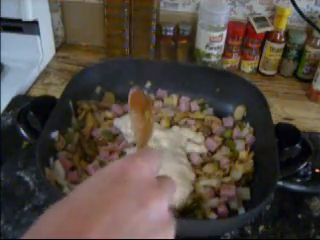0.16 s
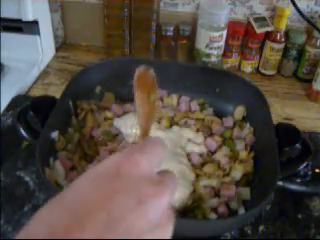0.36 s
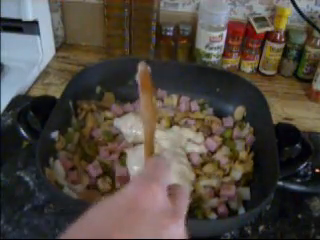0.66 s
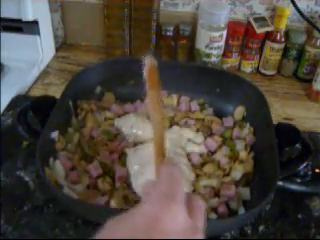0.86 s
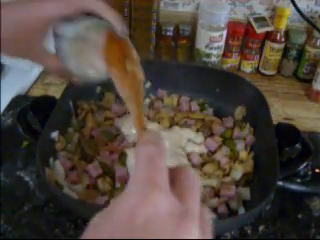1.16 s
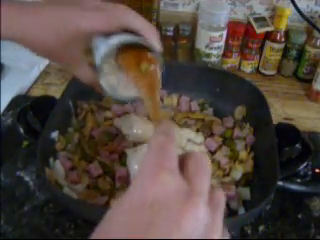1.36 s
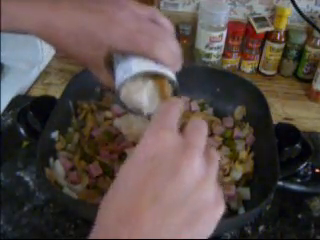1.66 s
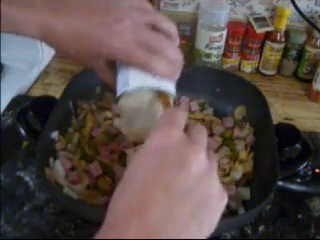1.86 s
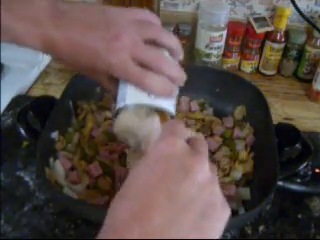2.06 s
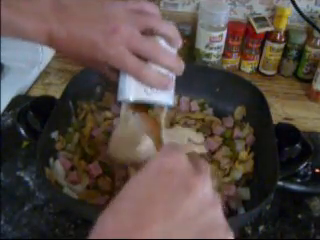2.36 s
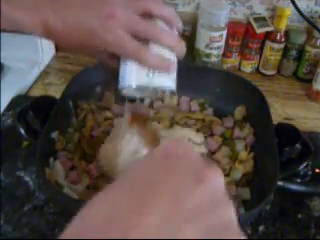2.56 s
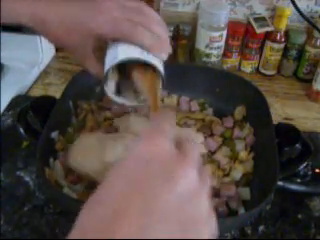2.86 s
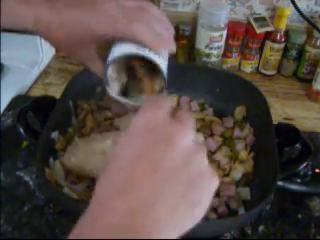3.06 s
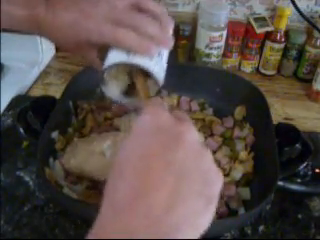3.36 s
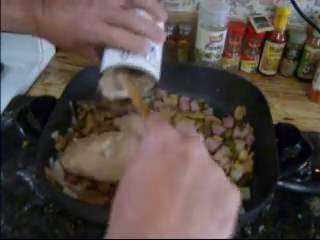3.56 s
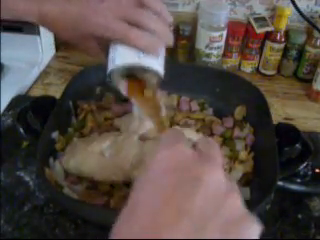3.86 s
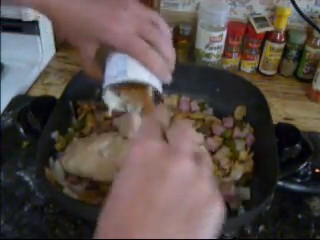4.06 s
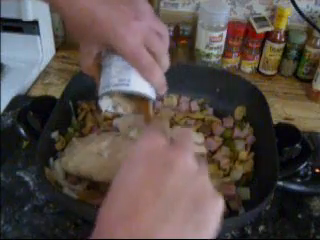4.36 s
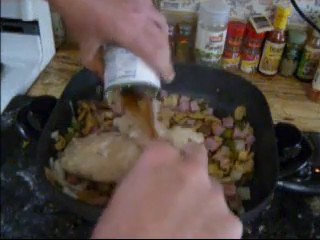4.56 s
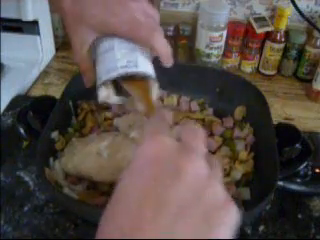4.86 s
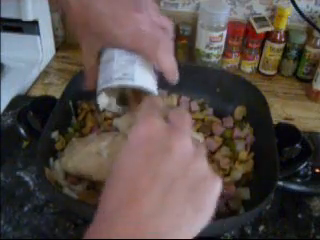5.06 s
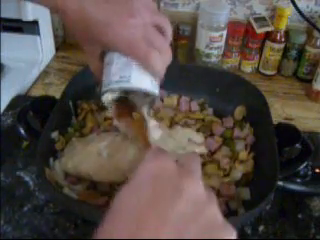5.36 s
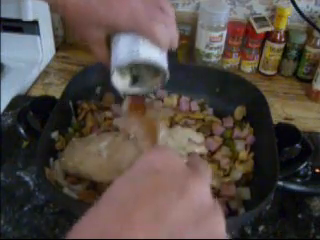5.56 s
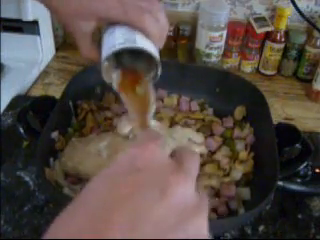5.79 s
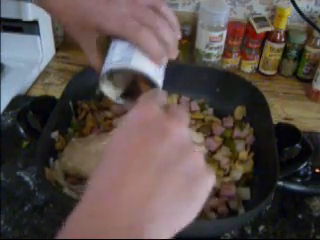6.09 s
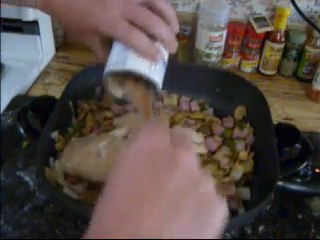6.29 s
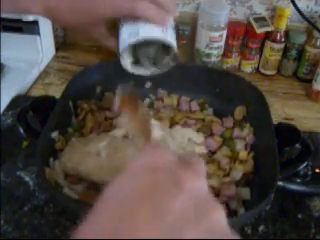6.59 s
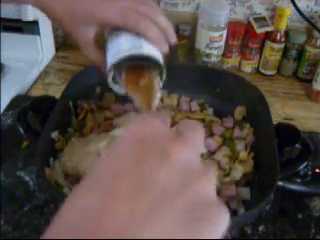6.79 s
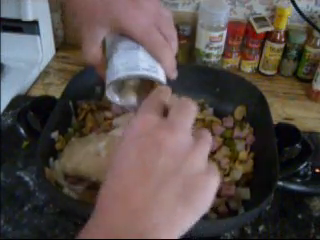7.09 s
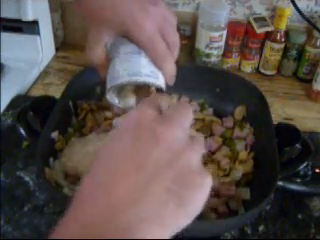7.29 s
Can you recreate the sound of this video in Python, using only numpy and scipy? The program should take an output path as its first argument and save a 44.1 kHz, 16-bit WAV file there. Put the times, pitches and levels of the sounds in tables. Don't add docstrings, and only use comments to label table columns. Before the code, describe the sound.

Close, dull tinny thocks and short gritty rubs of wood in a soup-lined can, with gentle frying and spitting fat behind.

```python
import sys
import numpy as np
from scipy import signal
from scipy.io import wavfile
from scipy.ndimage import uniform_filter1d

SR = 44100
rng = np.random.default_rng(int(sys.argv[2]) if len(sys.argv) > 2 else 0)


def magnitude_from_level(level_db):
    exponent = np.asarray(level_db, float) / 20
    return 10 ** exponent


def unload_audio(sound):
    columns = np.transpose(np.atleast_2d(sound))
    steps = np.round(np.clip(columns, -1, 1) * 32767)
    wavfile.write(sys.argv[1], SR, steps.astype(np.int16))


N = 327663

# start_s, peak_db, cavity_hz, brightness_db, favoured_upper_mode_hz
KNOCKS = [(3.036, -4.5, 888, -14.5, 3400), (3.043, -19, 910, -5, 3500), (3.179, -17.5, 842, -12.5, 1760),
          (4.054, -24.5, 694, -16, 1415), (4.134, -27.5, 782, -13, 2230), (4.226, -11.5, 792, -11.5, 1930),
          (4.502, -22.5, 590, -17, 2230), (4.892, -18.5, 662, -31, 3050), (5.3, -20, 654, -9, 1800),
          (5.325, -30, 600, -1, 4000), (6.354, -25, 635, -3, 2230), (7.053, -15.5, 813, -0.5, 2160),
          (7.417, -14, 662, -18, 2720)]
# pitch_hz, level_db, t60_s
LOW_MODES = [(378, -28.5, 0.061), (428, 13, 0.015), (500, 0, .06), (600, -8, 0.11), (630, -6.5, 0.15),
             (662, -13, 0.04), (670, -9, 0.027), (767, -12.5, 0.041), (800, -1.5, 0.059),
             (878, -1.5, 0.042), (933, 5, 0.05), (1110, -3, 0.12), (1185, -12, 0.031)]
# pitch_hz, level_db, t60_s
HIGH_MODES = [(1415, -3, 0.025), (1760, 0, 0.026), (1890, -6, 0.03), (2120, -2.5, 0.036), (2290, -7, 0.02),
              (2570, 0, 0.02), (2820, -4, 0.018), (3080, -2, 0.018), (3350, -1, 0.018), (3700, 0, 0.02),
              (4000, -3, 0.018), (4750, -1, .016), (5400, -4, 0.014), (6500, -2, 0.016)]


def rms_one(x):
    return x / np.sqrt(np.mean(x ** 2) + 1e-20)


def drift(rate_hz):
    r = np.exp(-80 * np.pi * rate_hz / SR)
    noise = rng.standard_normal(N // 40 + 2002)
    slow = signal.lfilter([1], [1, -2 * r, r * r], noise)[2000:]
    return np.interp(np.arange(N) / 40, np.arange(len(slow)), rms_one(slow))


def grains(per_s, spread_db):
    sizes = magnitude_from_level(spread_db * np.minimum(rng.exponential(1, N), 4)) * rng.choice([-1, 1], N)
    return rms_one(sizes * (rng.random(N) < per_s / SR))


def ring(clicks, hz, t60_s):
    r = magnitude_from_level(-60 / (t60_s * SR))
    w = 2 * np.pi * hz / SR
    return signal.lfilter([0, np.sin(w)], [1, -2 * r * np.cos(w), r * r], clicks + 1e-18)


def nearness(hz, centre_hz, octaves):
    return np.exp(-.5 * (np.log2(hz / centre_hz) / octaves) ** 2)


def add(out, s, sound):
    i = round(s * SR)
    out[i:i + len(sound)] += sound[:N - i]


def pan():
    # pitch_hz, level_db per Hz
    spectrum = [(18, -29), (30, 5.5), (69, -15), (131, -7.5), (200, -13.5), (311, -8), (379, -19),
                (462, -16), (756, -20), (943, -20.5), (1430, -22), (4790, -20), (9790, -22), (10800, -17),
                (14000, -57.5), (22000, -120)]
    points = np.array(spectrum)
    out, edges_hz = 0, 26 * 2 ** np.arange(0, 9.1, .5)
    white, fizz = rng.standard_normal((2, N)), grains(1500, spread_db=5.5)
    together = drift(13.0)
    for k, (low, high) in enumerate(zip(edges_hz, edges_hz[1:])):
        hz = np.sqrt(low * high)
        source = white[k % 2] + 0.5 * min(hz / 3000, 1) * fizz
        band = signal.sosfilt(signal.butter(2, [low, high], "band", fs=SR, output="sos"), source)
        level_db = np.interp(np.log(hz), np.log(points[:, 0]), points[:, 1])
        out = out + band * magnitude_from_level(level_db + 1.12 * together + 1.1 * drift(16))
    return magnitude_from_level(-40.5) * rms_one(out)


def whine():
    # pitch_hz, level_db (rms)
    whine_tones = [(5561, -65), (10718, -65), (10927, -56)]
    t = np.arange(N) / SR
    return sum(np.sqrt(2) * magnitude_from_level(db) * np.sin(2 * np.pi * hz * t) for hz, db in whine_tones)


def gate():
    openings = [-.05, .4032, .7785, 1.1585, 1.6021, 2.3132, 2.8687, 3.5859, 3.9812, 4.228, 4.839, 5.2589,
                5.702, 6.3345, 6.6537, 6.8331, 7.4022]
    # lifted_s, gain_db
    lifts = [(.19, 4), (.535, 2), (.882, 4), (1.355, 3), (1.9, -1.2), (2.61, 3.5), (3.27, 3), (3.716, 3.5),
             (4.135, 4), (4.26, 2.5), (4.91, 4.5), (5.322, 4), (6.0, -1.5), (6.376, 3.5), (6.656, 0),
             (7.15, 3.5), (7.41, 4)]
    # start_s, shut_s, gain_db just before the next opening
    closings = [(.2, 0.328, -15.5), (0.616, 0.712, -14), (0.945, 1.114, -17), (1.451, 1.567, -17),
                (1.986, 2.085, -20), (2.66, 2.782, -14), (3.342, 3.435, -12.5), (3.781, 3.902, -15),
                (4.15, 4.283, -3), (4.552, 4.733, -13), (5.032, 5.19, -13), (5.501, 5.626, -14),
                (6.06, 6.214, -14.5), (6.462, 6.642, -18), (6.65, 6.732, -10.5), (7.215, 7.335, -11.5),
                (7.44, 7.6, -10)]
    open_db, sag_db, shut_db = 1.16, 0.1, -11
    lift_s, snap_s = 0.081, .0015
    duck_above_db, duck_db_per_db, duck_in_s, duck_out_s = -14, 0.26, 0.0093, 0.2
    t, gain_db = np.arange(N) / SR, np.zeros(N)
    next_open = openings[1:] + [9.]
    for opens, lift, closing, then in zip(openings, lifts, closings, next_open):
        lifted, top_db = lift
        closes, shut, last_db = closing
        sagged = max(lifted - lift_s, (opens + lifted) / 2)
        times = [opens, sagged, lifted, closes, shut, max(then, shut + .01)]
        shape = np.interp(t, times, [open_db, min(sag_db, top_db), top_db, top_db, shut_db, last_db])
        share = np.clip((t - opens) / snap_s + 1, 0, 1)
        gain_db = gain_db + share * (shape - gain_db)
    for s, peak_db, *_ in KNOCKS:
        depth_db = duck_db_per_db * max(peak_db - duck_above_db, 0)
        times = [s, s + duck_in_s, s + duck_in_s + duck_out_s]
        gain_db = gain_db - np.interp(t, times, [0, depth_db, 0])
    return gain_db


def spits():
    # start_s, peak_db, pitch_hz
    droplets = [(0.17, -26, 4670), (0.5184, -30, 3090), (0.5571, -24.5, 3830), (0.8714, -25.5, 8700),
                (1.0449, -18, 3400), (1.3375, -23.5, 5550), (1.7642, -19, 9890), (1.7957, -21.5, 3400),
                (2.5833, -28, 5230), (3.263, -19.5, 4760), (3.2955, -27, 4330), (3.465, -21, 5100),
                (3.7024, -25.5, 4960), (3.7244, -25, 3920), (4.2756, -29, 3600), (4.3535, -22, 4950),
                (4.4742, -26, 4400), (4.868, -24, 4660), (4.8938, -25, 5180), (6.6535, -27, 2040),
                (5.3911, -18.5, 5500), (5.4415, -34, 4740), (6.3445, -22, 4530), (6.4717, -23, 5190),
                (6.653, -19.5, 5360), (6.8807, -21, 5460), (6.9175, -26, 5600), (7, -24.5, 4870),
                (7.0294, -27, 4900), (7.2284, -27.5, 3330)]
    knock_cracks = [(s, db + bright_db + 2, 3500) for s, db, _, bright_db, _ in KNOCKS]
    rows = droplets + knock_cracks
    out, t = np.zeros(N), np.arange(SR // 100) / SR
    cracks = rng.standard_normal((len(rows), len(t)))
    for (s, peak_db, hz), crack in zip(rows, cracks):
        tone = np.sin(2 * np.pi * hz * t) * magnitude_from_level(-60 * t / .003)
        snap = np.diff(crack, n=2, prepend=[0, 0]) / 2 * magnitude_from_level(-60 * t / .005)
        add(out, s + .0006, magnitude_from_level(peak_db - 1.0) * (0.73 * tone + 0.76 * snap))
    return out


def offset():
    # on_s, jump (0-1), off_s, fall_s
    leaks = [(.4033, .06, .515, .012), (.7795, .06, .872, .015), (1.1587, .055, 1.342, .013),
             (1.6021, .07, 1.725, .006), (1.6021, .01, 1.95, .22), (2.314, .1, 2.325, .013),
             (2.33, .025, 2.575, .018), (2.8685, .055, 3.035, .01), (3.5859, .068, 3.625, .046),
             (3.9813, .06, 4.055, .02), (4.8392, .065, 4.891, .013), (5.2585, .064, 5.272, .046),
             (5.7022, .07, 5.95, .33), (6.335, .105, 6.345, .014), (6.8331, .06, 7.039, .02)]
    creep_per_s, top, coupling_s = .4, .105, .1
    t, held = np.arange(N) / SR, np.zeros(N)
    for on, jump, off, fall in leaks:
        height = np.minimum(jump + creep_per_s * (np.clip(t, on, off) - on), top)
        times = [on - .001, on + 0.0022, off, off + fall]
        held = np.maximum(held, height * np.interp(t, times, [0, 1, 1, 0]))
    held = uniform_filter1d(held, size=60)
    r = np.exp(-1 / (coupling_s * SR))
    return signal.lfilter([1, -1], [1, -r], 1.08 * held)


def soup():
    # start_s, peak_db, pitch_hz
    glugs = [(2.314, -28, 450), (2.322, -26, 320), (2.329, -33, 480), (2.335, -28, 337), (2.344, -34, 382),
             (2.350, -43, 540), (2.351, -38, 850), (2.381, -25, 490), (2.385, -43, 353), (2.386, -55, 1260),
             (2.407, -37.5, 500), (2.419, -43, 554), (2.569, -39, 766), (2.624, -43, 772)]
    out, t = np.zeros(N), np.arange(SR // 12) / SR
    for s, peak_db, hz in glugs:
        shape = (1 - np.exp(-t / 0.0015)) * magnitude_from_level(peak_db - 7.5 - 60 * t / 0.058)
        add(out, s, shape * np.sin(2 * np.pi * hz * (t + 1.1 * t * t)))
    return out * magnitude_from_level(6.5 * drift(106))


def strokes():
    # start_s, length_s, rub_db, fade_db, cavity_hz
    spoon_strokes = [(2.879, .09, -36.5, 17, 805), (3.057, .065, -42, -1, 920),
                     (3.118, 0.041, -40, 10, 880), (3.2, 0.044, -43, 6, 746), (3.59, 0.084, -39, 3, 595),
                     (3.656, 0.09, -30.5, 9.5, 635), (3.763, 0.069, -34, 11, 689),
                     (4.054, 0.052, -26.5, 20, 650), (4.12, 0.07, -41, 10, 775),
                     (4.257, 0.049, -36, 21, 740), (4.354, 0.051, -43, -6, 655), (4.44, 0.17, -27, 25, 647),
                     (4.891, 0.059, -26, 20, 636), (4.983, 0.12, -48.5, -2, 660),
                     (5.259, 0.048, -34.5, -11, 673), (5.313, 0.11, -24, 25, 610),
                     (5.427, 0.1, -41, 20, 644), (6.336, 0.024, -30.5, -4, 750),
                     (6.362, 0.13, -30.5, 29, 722), (6.512, 0.059, -43, 10, 740),
                     (7.084, 0.036, -40, 20, 783), (7.132, 0.063, -41, 18, 746),
                     (7.403, .03, -26.5, 2, 638)]
    attack_s, release_s = .003, 0.038
    t, rub_db = np.arange(N) / SR, np.full(N, -80.)
    for s, length, level_db, fade_db, _ in spoon_strokes:
        times = [s - attack_s, s, s + length, s + length + release_s]
        stroke_db = np.interp(t, times, [-80, level_db, level_db - fade_db, -80])
        rub_db = np.maximum(rub_db, stroke_db)
    middles_s = [s + length / 2 for s, length, *_ in spoon_strokes]
    cavity_hz = np.interp(t, middles_s, [row[4] for row in spoon_strokes])
    bright_db = np.minimum(1 - 0.8 * (rub_db + 48.5), 10.0)
    return rub_db, cavity_hz, bright_db


def scrape():
    rub_db, cavity_hz, bright_db = strokes()
    rub = grains(2500, spread_db=2.0) * magnitude_from_level(rub_db + 1.2 * drift(33))
    bright_rub = rub * magnitude_from_level(bright_db)
    low = sum(ring(rub * (0.21 + nearness(hz, cavity_hz, 0.16)), hz, t60) * magnitude_from_level(db)
              for hz, db, t60 in LOW_MODES)
    high = sum(ring(bright_rub, hz, t60) * magnitude_from_level(db) for hz, db, t60 in HIGH_MODES)
    turn = np.exp(2j * np.pi * np.cumsum(cavity_hz) / SR)
    cavity = np.real(turn * signal.lfilter([1], [1, -magnitude_from_level(-60 / (.1 * SR))], rub / turn))
    grit = signal.sosfilt(signal.butter(2, [1300, 5000], "band", fs=SR, output="sos"), bright_rub)
    return magnitude_from_level(-3.0) * grit + magnitude_from_level(-32.0) * cavity + magnitude_from_level(-35.5) * low + magnitude_from_level(-35.5) * high


def knocks():
    # start_s, peak_db, cavity_hz
    slips = [(2.881, -37, 816), (4.254, -23, 800), (3.155, -43, 859), (3.611, -32, 600), (3.643, -19, 620),
             (3.66, -19, 663), (3.686, -24.5, 630), (3.753, -24, 662), (4.371, -30, 710),
             (4.413, -27.5, 630), (4.431, -19.5, 655), (4.455, -18.5, 625), (4.572, -32, 630),
             (4.996, -29.5, 648), (5.137, -28.5, 767), (5.265, -37, 686), (5.351, -18.5, 580),
             (5.492, -31.5, 770), (6.389, -24.5, 634), (6.438, -40, 640), (6.52, -32, 680),
             (7.086, -26, 810), (7.131, -25, 730), (7.138, -36, 827), (7.402, -12, 686), (4.913, -23, 664),
             (4.93, -23, 636), (4.958, -27, 665), (5.277, -24.5, 676), (5.314, -19.5, 601)]
    slip_bright_db, slip_upper_hz, slip_wall_db = -25, 4100, -7
    knock_contact_s, slip_contact_s = 0.00078, 0.0023
    thock_t60_s, thock_second_db = 0.056, -12.5
    rows = KNOCKS + [(*slip, slip_bright_db, slip_upper_hz) for slip in slips]
    s, peak_db, cavity_hz, bright_db, upper_hz = np.transpose(rows)
    at = np.round(s * SR).astype(int)
    out, t = np.zeros(N), np.arange(SR // 16) / SR
    chance = rng.normal(0, 1, (len(at), len(LOW_MODES) + len(HIGH_MODES)))
    slipped = np.arange(len(rows)) >= len(KNOCKS)
    for row, contact_s in zip(rows, np.where(slipped, slip_contact_s, knock_contact_s)):
        start_s, level_db, hz = row[:3]
        swell = 1 - np.exp(-t / contact_s)
        tone = np.sin(2 * np.pi * hz * t)
        tone = tone + magnitude_from_level(thock_second_db) * np.sin(2 * np.pi * 1.17 * hz * t)
        add(out, start_s, swell * magnitude_from_level(level_db - 6.0 - 60 * t / thock_t60_s) * tone)
        push = np.sin(2 * np.pi * 290 * t)
        add(out, start_s, swell * magnitude_from_level(level_db - 15.0 - 60 * t / 0.021) * push)
    for k, (hz, level_db, t60) in enumerate(LOW_MODES + HIGH_MODES):
        if k < len(LOW_MODES):
            strike_db = peak_db + slip_wall_db * slipped + level_db - 16.0 + 1.9 * chance[:, k]
            favour = 0.21 + nearness(hz, cavity_hz, 0.073)
        else:
            strike_db = peak_db + bright_db + level_db - 3.5 + 2.2 * chance[:, k]
            favour = 0.35 + nearness(hz, upper_hz, 0.051) + 0.47 * nearness(hz, 1.325 * upper_hz, 0.07)
        clicks = np.zeros(N)
        clicks[at] = magnitude_from_level(strike_db) * favour
        out += ring(clicks, hz, t60) * (-1) ** k
    return out


def kitchen(x):
    t = np.arange(SR // 4) / SR
    tail = rng.standard_normal(len(t)) * magnitude_from_level(-60 * t / 0.33) * (t > .004)
    tail = signal.lfilter([.4], [1, -.6], tail)
    return signal.fftconvolve(x, tail / np.sqrt(np.sum(tail ** 2)))[:N]


def scene():
    near = knocks() + scrape() + soup() + spits()
    return (magnitude_from_level(2) * (near + magnitude_from_level(-13.5) * kitchen(near)) + pan())[None]


def top_cut(x):
    return signal.sosfilt(signal.butter(12, 12200, fs=SR, output="sos"), x)


def record(dry):
    gate_db = gate()
    leaked_whine = whine() * magnitude_from_level(.4 * gate_db)
    gated = dry * magnitude_from_level(gate_db) + leaked_whine + offset()
    cut = signal.sosfilt(signal.butter(14, 10680, fs=SR, output="sos"), gated)
    sparse = cut * (1 + (-1) ** np.arange(N))
    rebuilt = signal.sosfilt(signal.cheby2(14, 46, 11450, fs=SR, output="sos"), sparse)
    rebuilt = signal.sosfilt(signal.ellip(10, .2, 40, 11170, fs=SR, output="sos"), rebuilt)
    return top_cut(rebuilt)


dry = scene()
out = record(dry)
unload_audio(out)
```